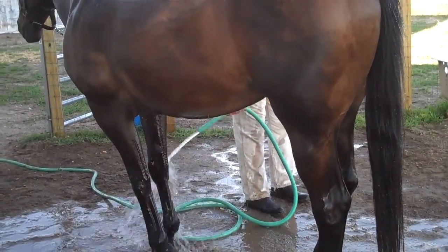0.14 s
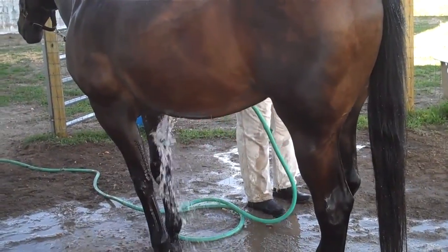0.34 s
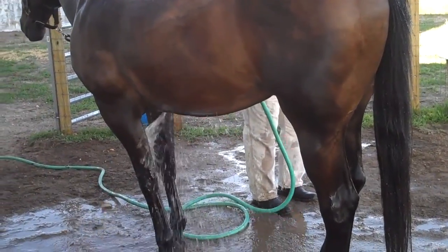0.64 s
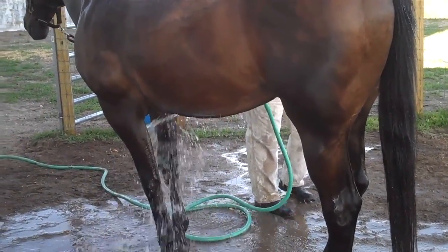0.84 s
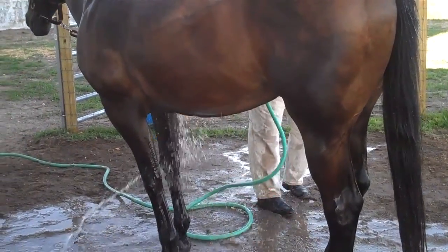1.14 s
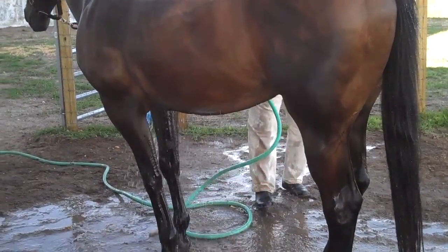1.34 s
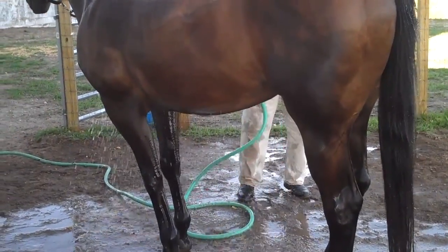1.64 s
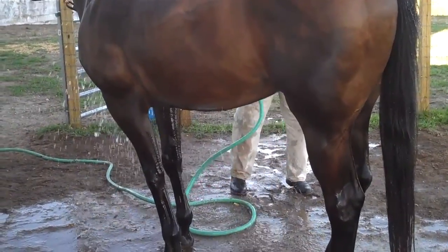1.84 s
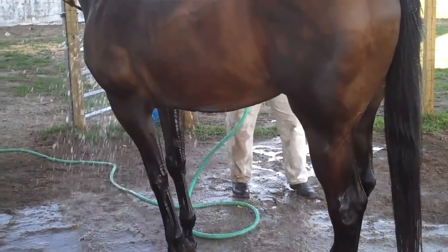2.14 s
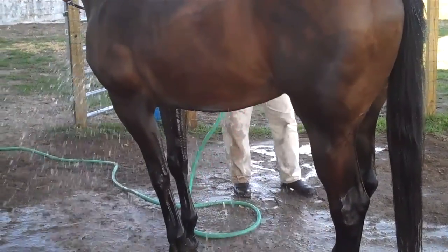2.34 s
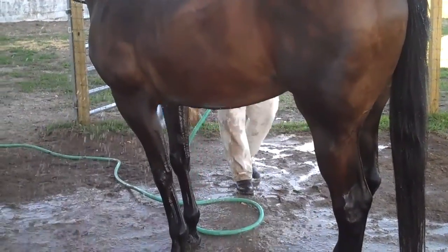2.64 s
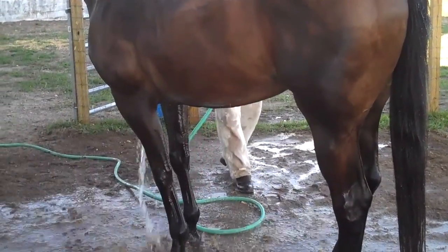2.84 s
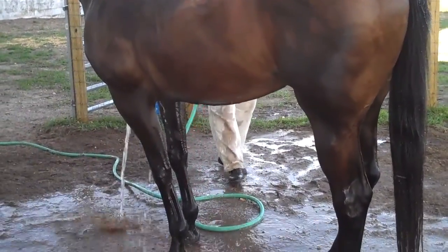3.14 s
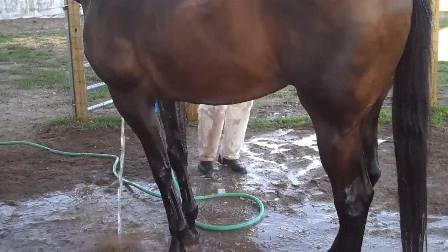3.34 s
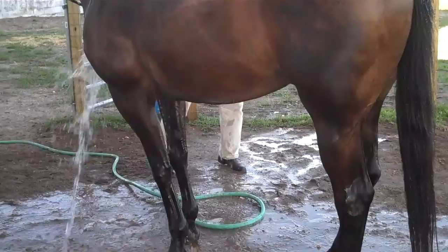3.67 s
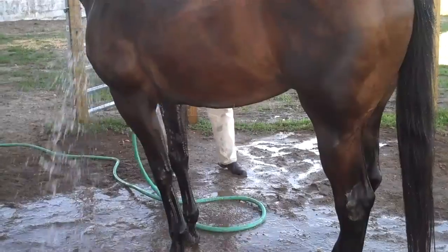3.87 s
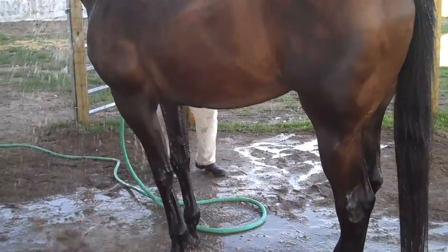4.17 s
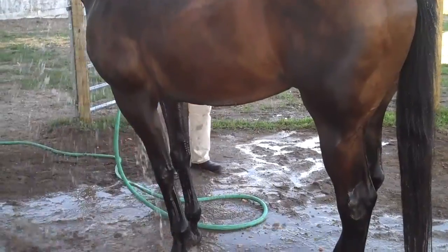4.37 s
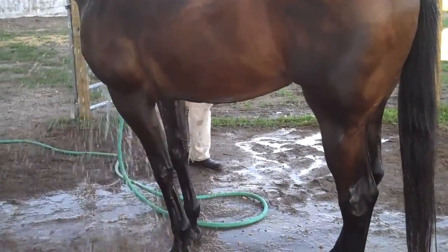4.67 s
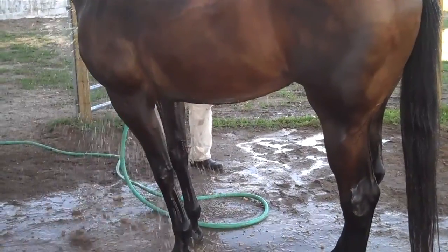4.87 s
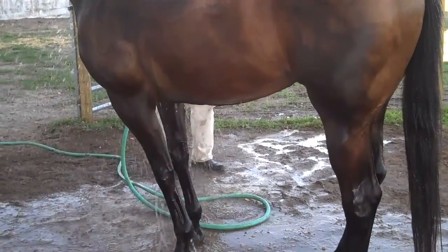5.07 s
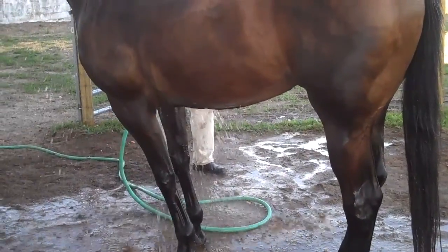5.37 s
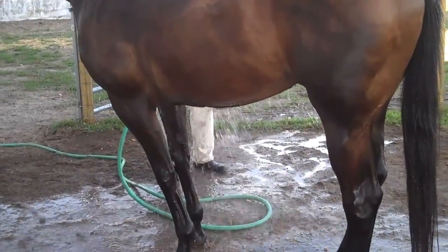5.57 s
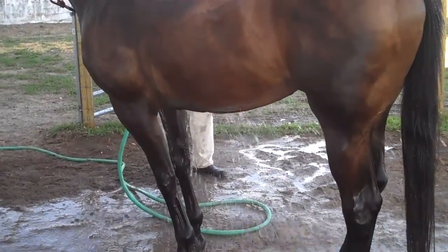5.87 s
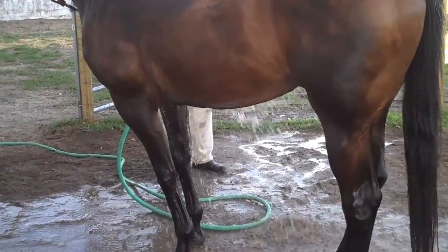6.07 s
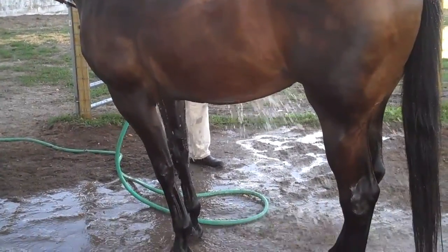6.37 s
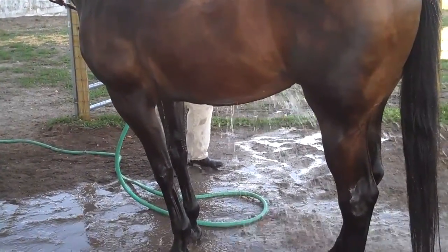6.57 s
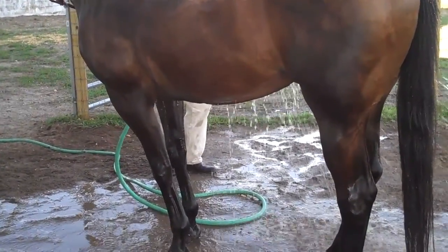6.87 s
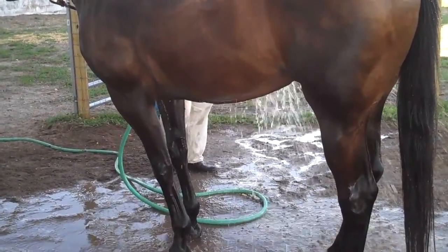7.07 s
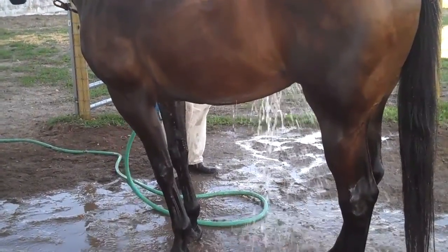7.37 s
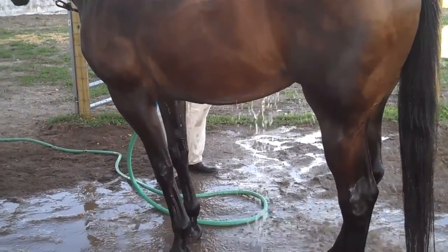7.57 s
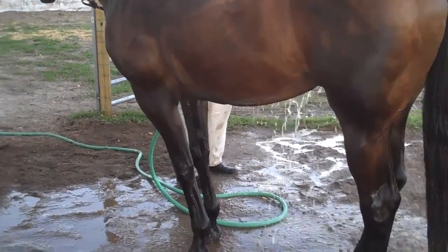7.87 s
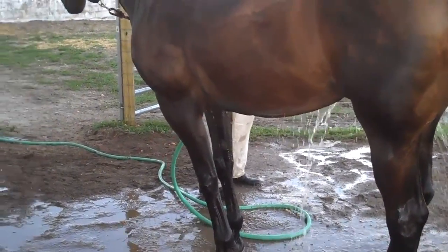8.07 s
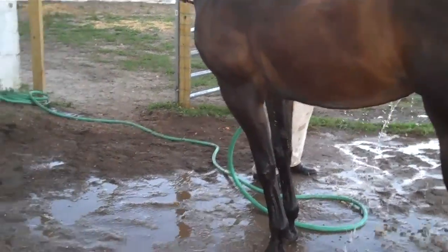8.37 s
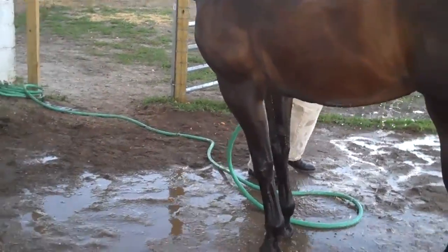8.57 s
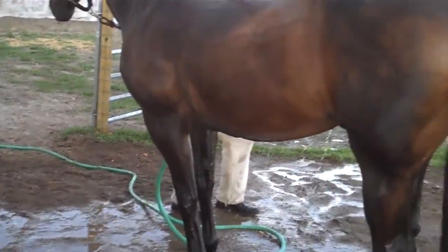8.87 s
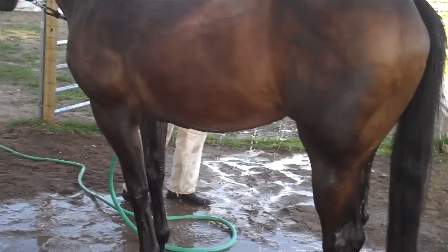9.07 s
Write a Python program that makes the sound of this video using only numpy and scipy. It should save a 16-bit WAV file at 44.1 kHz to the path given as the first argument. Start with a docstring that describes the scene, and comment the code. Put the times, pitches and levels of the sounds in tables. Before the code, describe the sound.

From 0 s a hose jet hisses and spatters on wet ground beside a horse, bright and grainy with some puddle churn. Short gushes come at about 0.7 and 1 s, then from 1.4 to 2.7 s the spray thins, leaving single plops and sharp drops exposed, one rounder plop near 2.05 s. At 2.87 s a strong splash bursts in, and heavier patter continues in surges, with dull little thuds and wind puffs around 3.5 s. Fuller splashing at 3.9 and 4.6 s alternates with brief lulls near 4.3 and 5.1 s. From 5.5 s the patter is finer and steadier, with cracks, ticks and a clear plop at 6.5 s. Ringing drops cluster from 8 to 9 s, a sharp crack at 8.64, ending with lower wet slaps around 9.15 s. Soft flank drumming, distant rumble and a faint wavering hum stay underneath; close, dry, outdoors.

```python
"""A garden hose plays over a horse in a muddy yard: impact noise and bubble resonance make its patter.
Slugs of run-off slap as short noise bursts, fat drops plop as ringing cavities, stray drops crack or blip.
The jet drums on the flank with a comb-filter echo; dry ticks and dull thuds are brief transients.
Light wind brushes the microphone as shaped noise, over distant rumble and a faint wavering hum."""
import sys
import numpy as np
from scipy import signal
from scipy.fft import rfft, irfft
from scipy.io import wavfile
from scipy.ndimage import uniform_filter1d

SR = 44100
rng = np.random.default_rng(int(sys.argv[2]) if len(sys.argv) > 2 else 0)


def unload_wav(signal):
    """Save mono or channel-first audio to the path in sys.argv[1] as 16-bit WAV at rate SR, clipped to [-1, 1]."""
    wavfile.write(
        sys.argv[1],
        SR,
        np.round(np.clip(np.atleast_2d(signal).T, -1, 1) * 32767).astype(np.int16),
    )


N = 406602
TIME = np.arange(N) / SR
CUTOFF_HZ = 14000  # upper limit of the slaps and of the record

# Relative filter gain of the patter: f/Hz, level/dB
PATTER_SPECTRUM = [(500, -18), (1200, -19.5), (1800, -7.5), (2400, 1), (3200, 2), (4200, 4), (6000, 1.5),
                   (8000, 1), (11000, -15.5), (14000, -48)]
# Relative filter gain of the puddle splash: f/Hz, level/dB
PUDDLE_SPECTRUM = [(300, -34), (700, -16), (1100, -10.5), (1500, -12), (2100, -4), (2700, -6.5),
                   (3600, -22), (6000, -4)]
# Relative filter gain of the fine mist: f/Hz, level/dB
MIST_SPECTRUM = [(2000, -26), (4500, -3), (7000, -0.5), (9000, 0), (11000, -4), (14000, -9)]
# The more water lands in puddles, the lower the patter's edge reaches; it also wanders at random
EDGE_HZ, EDGE_AT_DB = 1700, -17.5  # edge at this puddle share
EDGE_OCTAVES_PER_DB, EDGE_WANDER_OCTAVES = 0.29, 0.069
# The hollow that the jet digs in the water: centre, wander and strength of its ring
HOLLOW_HZ, HOLLOW_WANDER_OCTAVES, HOLLOW_DB = 3260, .33, 0


def spray():
    """Impact noise and bubble resonance: drops tick on coat and mud, ring bubbles and churn puddles."""
    patter_level, puddle_level, mist_level = gushes()
    # a weak spray has fewer drops, which stand out singly
    flow = rms_one(patter_level)

    # the water lands in lumps: quick ones on the coat, slower ones in the puddles
    surge = np.sqrt(flow) + clumps(per_s=160 * flow, spread_db=2.7, decay_s=.0016)
    slosh = .35 + clumps(per_s=100, spread_db=2.3, decay_s=.0045)
    ticks = rms_one(impacts(per_s=5000 * flow, spread_db=0.0))
    droplets = rms_one(impacts(per_s=3500 * flow, spread_db=2.0))

    # brief fizz, long-ringing drips and the low churn of the puddles
    fizz = bubbles(flow, spread_db=4.0, low_hz=1790, high_hz=12100, cycles=3.9, count=20000, size=128)
    drips = bubbles(np.sqrt(flow), spread_db=3.0, low_hz=1860, high_hz=9500, cycles=36,
                    count=4200, size=384)
    churn = bubbles(puddle_level, spread_db=2.5, low_hz=1072, high_hz=2890, cycles=20.5,
                    count=3500, size=640)

    grain = spatter(fizz + .5 * ticks + .5 * rng.standard_normal(N), flow)
    coat = rms_one(surge * grain)
    patter = coloured(coat + .45 * np.minimum(flow, 1) * drips, PATTER_SPECTRUM)
    puddle_share_db = 20 * np.log10(puddle_level / patter_level)
    edge_octaves = EDGE_WANDER_OCTAVES * drift(22) - EDGE_OCTAVES_PER_DB * (puddle_share_db - EDGE_AT_DB)
    patter = swept(patter, EDGE_HZ * 2 ** edge_octaves, q=0.58)
    hollow_hz = HOLLOW_HZ * 2 ** (HOLLOW_WANDER_OCTAVES * drift(9))
    patter = patter + from_db(HOLLOW_DB) * swept(patter, hollow_hz, q=7.3, peak=True)

    puddle = coloured(slosh * (churn + .4 * ticks), PUDDLE_SPECTRUM)
    fine_spray = spatter(droplets + fizz + from_db(-1) * rng.standard_normal(N), flow)
    mist = coloured(surge ** .4 * fine_spray, MIST_SPECTRUM)
    return patter_level * steady(patter) + puddle_level * steady(puddle) + mist_level * steady(mist)


# Even spray on the coat as the jet is aimed: t/s, patter level/dB, puddle splash re patter level/dB
AIMED_SPRAY = [(0, -41.5, -13.5), (.42, -42, -17), (.6, -46, -19.5), (1.3, -44, -14), (1.38, -48.5, -17),
               (1.55, -50.5, -21.5), (1.93, -51, -15.5), (2.15, -47.5, -13), (2.75, -50, -16),
               (3.1, -45, -13.5), (3.5, -46, -13), (3.87, -42, -12), (4.255, -43, -16), (4.29, -51, -16),
               (4.395, -51, -17), (4.55, -43.5, -13), (5.04, -42.5, -11), (5.08, -46, -15.5),
               (5.22, -43.5, -15), (5.29, -46, -17), (5.8, -42.5, -18), (6.7, -43.5, -20), (6.97, -45, -21),
               (7.2, -41.5, -19), (7.8, -45, -17), (8.3, -42.5, -17), (8.9, -44, -21.5), (9.22, -43, -17)]
# Jet or sheets of run-off reaching the ground: t/s, length/s, patter level/dB,
# puddle splash re patter level/dB, mist re patter level/dB
GROUND_GUSHES = [(0.0, .14, -39, -8, -22), (0.206, .17, -40, -14, -20), (.69, .19, -43, -14, 4),
                 (0.985, .14, -40, -12, 3.5), (1.125, .19, -37.5, -10, -3.5), (1.973, .15, -45.5, -9.5, -1),
                 (2.458, .045, -41.5, -15.5, 2.5), (2.826, .04, -44, -12, 14),
                 (2.866, .11, -34, -6.5, -2.5), (3.0, .12, -38, -11, -3.5), (3.184, .05, -41, -10, -5),
                 (3.336, .04, -41, -11, -13), (3.65, .19, -37.5, -8.5, -19), (3.899, .23, -36, -12, 1.5),
                 (4.397, .09, -40, -10.5, -2), (4.61, .42, -38.5, -11, 0), (5.44, .05, -46, -5, -13),
                 (5.529, .14, -40.5, -16, -2.5), (5.883, .22, -40.5, -16, -0.5), (6.126, .02, -36, -17, -6),
                 (6.213, .03, -39, -14, 5), (6.272, .04, -34, -15, 1.5), (6.46, .07, -41, -16, 0),
                 (7.25, .1, -38, -18, 3.5), (7.35, .04, -35, -15, -8), (7.53, .07, -39, -10, -1),
                 (7.673, .04, -42, -9.5, -4), (7.83, .04, -40, -12, -12), (7.968, .25, -42, -13, -6),
                 (8.45, .06, -41, -18, -13), (8.653, .08, -39, -19, 0.5), (9.04, .08, -35, -18.5, -1.5),
                 (9.11, .11, -41, -1.5, -18)]
GUSH_ATTACK_S, GUSH_SAG_DB_PER_S, GUSH_RELEASE_S = .008, 6, .042
GUSH_SWELL_SHARE = .08  # share of the gush length added to its attack
SPRAY_MIST_DB = 4  # mist of the even spray, relative to its mean patter
MIST_FOLLOWS = 0.77  # share of the patter's swing in dB that the mist follows
WOBBLE_DB, WOBBLE_HZ = 0.17, 14  # the hand-held jet never lands evenly


def gushes():
    """Power addition: gushes set in fast, sag and drain on top of the even spray's three levels."""
    aim_db, pool_db = in_time(AIMED_SPRAY)
    mean_db = aim_db.mean()
    haze_db = mean_db + SPRAY_MIST_DB + MIST_FOLLOWS * (aim_db - mean_db)
    power = from_db([aim_db, aim_db + pool_db, haze_db]) ** 2
    for s, length_s, db, puddle_db, mist_db in GROUND_GUSHES:
        at = max(int(s * SR), 0)
        age = TIME[:min(SR, N - at)]
        attack_s = GUSH_ATTACK_S + GUSH_SWELL_SHARE * length_s
        shape = (1 - np.exp(-age / attack_s)) * from_db(-GUSH_SAG_DB_PER_S * age)
        shape = shape * np.exp(-np.maximum(age - length_s, 0) / GUSH_RELEASE_S)
        peaks = from_db([[db], [db + puddle_db], [db + mist_db]])
        power[:, at:at + len(age)] += (peaks * shape) ** 2
    return np.sqrt(power) * from_db(WOBBLE_DB * drift(WOBBLE_HZ))


def clumps(per_s, spread_db, decay_s):
    """Jet break-up: each lump lands at once and scatters into droplets whose power dies away."""
    r = np.exp(-1 / (decay_s * SR))
    power = signal.lfilter([1], [1, -r], impacts(per_s, spread_db) ** 2)
    return np.sqrt(power / np.mean(power))


def spatter(x, flow, count=5):
    """Band-wise modulation: lumps of each size splash in their own band at their own moments."""
    spectrum, hz = rfft(x), np.fft.rfftfreq(N, 1 / SR)
    band = np.digitize(hz, np.geomspace(2400, 10500, count - 1))
    out = np.zeros(N)
    for k in range(count):
        lumps = 1.15 + clumps(per_s=260 * np.sqrt(flow), spread_db=2.3, decay_s=.0016)
        out += irfft(spectrum * (band == k), N) * lumps
    return out


def bubbles(flow, spread_db, low_hz, high_hz, cycles, count, size):
    """Bubble resonance: born as often as the flow dictates, each rings at its slightly rising pitch."""
    when, pitch, strength, damping = rng.random((4, count, 1))
    at = np.searchsorted(np.cumsum(flow) / np.sum(flow), when) + np.arange(size)
    hz = low_hz * (high_hz / low_hz) ** pitch
    turns = hz * np.arange(size) / SR
    age = turns / (cycles * (.5 + damping))  # the ring has decayed by 60 dB at age 1
    gain = from_db(spread_db * np.minimum(-np.log(1 - strength), 4)) * hz / low_hz
    rings = gain * np.exp(-np.log(1000) * age) * np.sin(2 * np.pi * turns * (1 + 0.086 * age))
    return rms_one(np.bincount(at.ravel(), rings.ravel(), N)[:N])


# Water on the horse: t/s, level/dB, pitch of the ground-echo colour f/Hz
FLANK_DRUMMING = [(0, -84, 520), (1.1, -59, 530), (1.7, -75, 556), (2.4, -60, 704), (3.2, -68, 630),
                  (4.1, -61, 660), (4.82, -58.5, 640), (5.1, -66.5, 546), (5.7, -65, 443), (9.22, -63, 430)]
# Relative filter gain of the thuds on the flank: f/Hz, level/dB
FLANK_SPECTRUM = [(120, -22.5), (300, -5.5), (450, -0.5), (600, 1), (900, 1), (1300, -9), (2500, -20.5)]


def drumming():
    """Comb filtering: jet thuds on the flank join their ground echo, whose delay moves with the jet."""
    level_db, echo_hz = in_time(FLANK_DRUMMING)
    direct = coloured(impacts(per_s=900, spread_db=0.5), FLANK_SPECTRUM)
    echo = np.interp(TIME - 1 / echo_hz, TIME, direct)
    return from_db(level_db) * rms_one(direct + 0.69 * echo)


# Slugs of water on coat and ground: t/s, burst level before its envelope/dB, decay/s, centre f/Hz
WATER_SLAPS = [(0.705, -25.5, 0.0061, 6260), (0.731, -25.5, 0.0054, 6100), (.877, -26, .004, 6000),
               (1.152, -29, 0.014, 5000), (1.191, -25, 0.0057, 5430), (1.349, -24.5, 0.0046, 3880),
               (2.213, -25.5, 0.003, 6100), (2.318, -22, 0.0025, 3970), (2.869, -24.5, 0.02, 3040),
               (3.092, -25, 0.0048, 3200), (3.361, -32, 0.0046, 7400), (3.819, -28, 0.0041, 2300),
               (3.838, -23, 0.0034, 3160), (4.088, -28, 0.0082, 2980), (4.348, -26.5, 0.0034, 4550),
               (4.774, -24, 0.0035, 5600), (5.031, -27, 0.0037, 3850), (5.2, -26, 0.0035, 4000),
               (5.23, -26, 0.0035, 4800), (5.637, -24, 0.0033, 4600), (5.923, -28, 0.0051, 4800),
               (6.145, -24, 0.0053, 5100), (6.292, -24, 0.0032, 6600), (6.319, -21, 0.0024, 4500),
               (6.814, -31.5, 0.014, 4900), (7.368, -27, 0.0067, 4220), (8.104, -23, 0.0032, 5100),
               (8.337, -25, 0.0023, 5800), (9.116, -29.5, 0.005, 2700), (9.133, -25.5, 0.0033, 1970),
               (9.169, -29, 0.0056, 1495), (9.183, -27.5, 0.0025, 2400), (9.213, -27.5, 0.0061, 2000)]


def slaps(rise_s, width, size=4096):
    """Band-limited impact noise: a slug of water bursts into a dense, broad, decaying crackle."""
    out, age = np.zeros(N + size), TIME[:size]
    crackle = impacts(per_s=18000, spread_db=2.5)
    for s, db, decay_s, hz in WATER_SLAPS:
        at = int(s * SR)
        edges_hz = [hz / width, min(hz * width, CUTOFF_HZ)]
        band = signal.butter(2, edges_hz, "band", fs=SR, output="sos")
        burst = rms_one(signal.sosfilt(band, crackle[at - size:at]))
        envelope = (1 - np.exp(-age / rise_s)) * np.exp(-age / decay_s)
        out[at:at + size] += from_db(db) * envelope * burst
    return out[:N]


# The loudest fat drops: t/s, peak level of the ring's envelope/dB, f/Hz, spatter re that peak level/dB
FAT_DROPS = [(0.2466, -22.5, 3270, -25), (0.3311, -30, 2090, -22), (0.835, -36, 1250, -6),
             (0.877, -21, 3800, -30), (1.0222, -23.5, 3020, -28), (1.0758, -27, 2630, -28),
             (1.3346, -22, 4410, -8), (1.866, -24.5, 3940, -13), (1.888, -35, 2320, -3),
             (1.9933, -28.5, 5070, -0.5), (2.0558, -17, 2370, -35), (2.3193, -23.5, 2780, -22),
             (2.3553, -26.5, 8060, -1.5), (2.4656, -20.5, 3820, -2.5), (2.873, -22, 2630, 2),
             (3.016, -18, 6430, -12), (3.564, -23, 3000, -31), (3.665, -23.5, 2900, -1),
             (3.7663, -26, 3730, -17), (3.82, -27.5, 1340, -26), (3.8197, -25, 2400, -19),
             (4.087, -17.5, 2860, -15), (4.406, -26.5, 3720, -5), (4.465, -39, 1510, -4),
             (5.118, -27.5, 2900, -20), (5.906, -20, 4770, -23), (6.536, -14, 3950, -27),
             (7.097, -32, 2060, -24), (7.113, -38, 1910, -28), (7.599, -27, 3200, -12),
             (7.699, -23, 2360, -23), (7.992, -29, 2660, -25), (8.0138, -21.5, 2670, -16),
             (8.174, -24, 3920, -25), (8.2423, -18, 4120, -29), (8.2496, -16, 2410, -16),
             (8.3221, -27, 5300, -12), (8.4594, -19, 3100, -21), (8.665, -27.5, 6260, 1.5),
             (8.745, -24, 4440, -13), (8.826, -18, 5500, -17), (8.9588, -17, 6000, -28),
             (9.053, -18, 4930, -23.5), (9.1718, -26, 1740, -5.5), (9.205, -24.5, 3630, -1)]
# Drops pitched below the reference open larger cavities, which ring for more cycles
PLOP_REF_HZ, PLOP_SIZE_POWER = 3500, 0.093


def plops(swell_cycles, smack_db, smack_s, spatter_s):
    """Cavity resonance: a fat drop smacks down, its cavity rings a few cycles, and fine spatter flies."""
    rings, splash, t = np.zeros(N + SR), np.zeros(N + SR), np.arange(SR // 12) / SR
    for s, db, hz, spatter_db in FAT_DROPS:
        age = t * hz / (swell_cycles * (PLOP_REF_HZ / hz) ** PLOP_SIZE_POWER)
        at = int(s * SR)
        rings[at:at + len(t)] += from_db(db) * age * np.exp(1 - age) * np.sin(2 * np.pi * hz * t)
        smack = from_db(db + smack_db) * np.exp(-t / smack_s)
        splash[at:at + len(t)] += smack + from_db(db + spatter_db) * np.exp(-t / spatter_s)
    # splash filter: (Hz, relative dB)
    colour = [(500, -7.5), (1400, -9), (2500, 8.5), (5000, 11.0), (9000, 7.0), (14000, -10.0)]
    splash = splash[:N]
    return rings[:N] + coloured(splash * rng.standard_normal(N), colour) * np.sqrt(np.mean(splash ** 2))


# The sharpest drops cracking on mud: t/s, peak of the envelope before the noise and band filter, level/dB
MUD_CRACKS = [(.509, -24), (2.04, -25), (2.099, -25), (2.608, -20), (2.705, -29), (2.768, -23),
              (4.012, -19), (4.417, -24), (4.466, -19), (5.1865, -17), (5.331, -18.5), (5.551, -19),
              (7.087, -21.5), (8.29, -21), (8.636, -15.5)]


def stray_drops(crack_s, blip_db):
    """Impact noise and bubble resonance: drops clear of the jet crack on mud or blip in shallow water."""
    hits = from_db(-33.5) * np.abs(impacts(per_s=42, spread_db=2.4))
    for s, db in MUD_CRACKS:
        hits[int(s * SR)] = from_db(db)
    envelope = signal.lfilter([1], [1, -np.exp(-1 / (crack_s * SR))], hits + 1e-18)
    band = signal.butter(2, [2700, 9500], "band", fs=SR, output="sos")
    cracks = signal.sosfilt(band, envelope * rng.standard_normal(N))
    blips = bubbles(from_db(in_time(AIMED_SPRAY)[0]), spread_db=2.2, low_hz=2000, high_hz=4600,
                    cycles=22, count=200, size=768)
    return cracks + from_db(blip_db) * blips


def scatter(x, t60, wet_db):
    """Diffuse reflection: ground, horse and fence throw back a short, exponentially decaying tail."""
    t = np.arange(SR // 4) / SR
    tail = rng.standard_normal(len(t)) * np.exp(-np.log(1000) * t / t60) * (t > .002)
    return x + from_db(wet_db) * signal.fftconvolve(x, tail / np.linalg.norm(tail))[:N]


# Dry little ticks: t/s, peak level/dB
BLUNT_TICKS = [(0.557, -32.5), (0.837, -33), (3.966, -26), (4.088, -30.5), (5.885, -26), (6.149, -31),
               (6.348, -23.5), (7.322, -25)]


def dry_ticks(dull_hz):
    """Impulse response of a one-pole low-pass: short blunt ticks with no ring."""
    clicks = np.zeros(N)
    for s, db in BLUNT_TICKS:
        clicks[int(s * SR)] = from_db(db)
    return signal.lfilter([1], [1, -np.exp(-2 * np.pi * dull_hz / SR)], clicks + 1e-18)


# Dull, short low thuds: t/s, peak level of the envelope/dB, f/Hz
DULL_THUDS = [(3.109, -40, 274), (3.141, -46, 300), (3.383, -43, 340), (3.455, -41, 229), (3.496, -39, 310),
              (3.544, -40, 600), (3.548, -37, 380), (3.564, -46, 220), (3.571, -32, 282),
              (3.573, -35.5, 640), (3.582, -36, 180), (3.599, -41, 200), (3.857, -45, 149),
              (3.877, -47, 190), (4.517, -45, 231), (4.528, -50, 191), (4.775, -52, 160),
              (5.53, -39.5, 208), (5.604, -50, 260), (8.27, -47, 185)]


def thuds(swell_cycles):
    """Heavily damped oscillation: each thud swells and dies within about two cycles."""
    out, t = np.zeros(N + SR), TIME[:SR // 20]
    for s, db, hz in DULL_THUDS:
        age, at = t * hz / swell_cycles, int(s * SR)
        out[at:at + len(t)] += from_db(db) * age * np.exp(1 - age) * np.sin(2 * np.pi * hz * t)
    return out[:N]


# Puffs on the microphone: t/s, level before the low cut/dB, half length/s, deep bass re that level/dB
WIND_PUFFS = [(1.912, -61, 0.028, -1), (3.45, -54.5, 0.03, -11), (3.59, -47.5, 0.053, -9),
              (3.878, -54, 0.023, -5), (4.24, -53, 0.049, -2), (4.532, -57.5, 0.014, 1),
              (5.615, -54.5, 0.038, -7), (5.86, -71, .1, 7)]
# Relative filter gain of the body of a puff: f/Hz, level/dB
WIND_SPECTRUM = [(25, -26), (70, -1), (130, -1), (220, 3), (350, -8), (550, -9), (900, -34), (2000, -23)]
WIND_LOW_CUT_HZ = 125  # border between the body of a puff and its deep bass


def wind():
    """Turbulence noise: short lumpy puffs; stronger ones reach higher, some thump in the deep bass."""
    level, deep_level = np.zeros(N), np.zeros(N)
    for s, db, half_s, deep_db in WIND_PUFFS:
        swell = from_db(db) / (1 + ((TIME - s) / half_s) ** 2)
        level += swell
        deep_level += swell * from_db(deep_db)
    lumps = rng.standard_normal(N) * from_db(2.5 * drift(80))
    upper = coloured(lumps, [(150, -15.0), (350, 0.0), (600, -1.5), (1000, -14.0), (2000, -15.0)])
    puffs = level * (coloured(lumps, WIND_SPECTRUM) + 0.84 * np.sqrt(level / level.max()) * upper)
    low_cut = signal.butter(2, WIND_LOW_CUT_HZ, "high", fs=SR, output="sos")
    deep_band = signal.butter(2, [45, WIND_LOW_CUT_HZ], "band", fs=SR, output="sos")
    deep = rms_one(signal.sosfilt(deep_band, rng.standard_normal(N)))
    return signal.sosfilt(low_cut, puffs) + deep_level * deep


# Distant rumble: t/s, level/dB
RUMBLE_LEVEL = [(0, -53), (1.2, -58), (2.2, -52.5), (4.6, -57), (5.4, -52), (6.8, -56), (9.22, -56.5)]
# Relative filter gain of the rumble: f/Hz, level/dB
RUMBLE_SPECTRUM = [(25, 10), (50, -11), (100, -0.5), (140, -14), (220, 0.5), (400, 0), (700, -4.5),
                   (1000, 1), (2000, 2.5), (5000, -4)]
# Far hum partials: f/Hz, level before swell and waver/dB
HUM_PARTIALS = [(109, -82), (326, -82.5)]
# Swelling and fading of the hum: t/s, added level/dB
HUM_SWELLING = [(0, 12.5), (.95, 6.5), (1.3, -2), (1.9, 13), (2.8, 10.5), (3.3, 4), (4.8, 4.5), (5.45, 12),
                (6.1, 10), (6.7, -5), (8, 1.5), (8.4, 8.5), (9.22, 3)]
HUM_WAVER_DB = 4.5


def yard():
    """Filtered noise and modulated tones: distant rumble and a hum wavering in pitch and level."""
    (rumble_db,), (swell_db,) = in_time(RUMBLE_LEVEL), in_time(HUM_SWELLING)
    hum = np.zeros(N)
    for hz, db in HUM_PARTIALS:
        level = from_db(db + swell_db + HUM_WAVER_DB * drift(2.6))
        phase = 2 * np.pi * np.cumsum(hz + 0.8 * drift(6.2)) / SR
        hum += level * np.sqrt(2) * np.sin(phase)
    return from_db(rumble_db) * coloured(rng.standard_normal(N), RUMBLE_SPECTRUM) + hum


def impacts(per_s, spread_db):
    """Random point process: clicks of either sign, many small and few large."""
    sizes = from_db(spread_db * np.minimum(rng.exponential(1, N), 4)) * rng.choice([-1, 1], N)
    return sizes * (rng.random(N) < per_s / SR)


def coloured(x, spectrum, size=8192):
    """Minimum-phase filtering: a causal filter with the given spectrum, scaled to rms 1."""
    hz, db = np.transpose(spectrum)
    shape = np.interp(np.log(np.fft.rfftfreq(size, 1 / SR) + 1), np.log(hz), db)
    cepstrum = irfft(np.log(from_db(shape)))[:size // 2]  # the causal half gives minimum phase
    response = irfft(np.exp(2 * rfft(cepstrum, size)))
    return rms_one(signal.oaconvolve(x, response)[:N])


def swept(x, corner_hz, q, peak=False, size=256):
    """Second-order resonance: a two-pole high-pass, or resonant peak, whose frequency moves."""
    out, state = np.zeros(N), np.zeros(2)
    for at in range(0, N, size):
        w = 2 * np.pi * np.clip(corner_hz[at], 500, 6000) / SR
        c, damping = np.cos(w), np.sin(w) / (2 * q)
        b = [damping, 0, -damping] if peak else np.array([1, -2, 1]) * (1 + c) / 2
        a = [1 + damping, -2 * c, 1 - damping]
        out[at:at + size], state = signal.lfilter(b, a, x[at:at + size], zi=state)
    return out


def steady(x):
    """Level normalisation: keep the grain, even out the slow level."""
    return x / np.sqrt(uniform_filter1d(x ** 2, size=5000) + 1e-9)


def drift(rate_hz):
    """Low-passed noise: slow chance with spread 1."""
    size = N // 32
    hz = np.fft.rfftfreq(size, N / size / SR)
    slow = irfft(rfft(rng.standard_normal(size)) / (1 + (hz / rate_hz) ** 2), size)
    return np.interp(TIME, np.linspace(0, N / SR, size), rms_one(slow))


def in_time(rows):
    """Linear interpolation: each column of a curve at every sample."""
    s, *columns = np.transpose(rows)
    return [np.interp(TIME, s, c) for c in columns]


def rms_one(x):
    """Power normalisation: scale to rms 1."""
    return x / np.sqrt(np.mean(x ** 2) + 1e-20)


def from_db(db):
    """Logarithmic level: decibels to amplitude gain."""
    return 10 ** (np.asarray(db) / 20)


def scene():
    """Superposition: water, ticks, thuds, wind and yard add at one microphone."""
    drops = plops(swell_cycles=1.22, smack_db=-8.5, smack_s=0.0007, spatter_s=0.0024)
    drops = drops + stray_drops(crack_s=0.00053, blip_db=-56)
    splashes = scatter(drops + slaps(rise_s=0.0012, width=1.76), t60=0.058, wet_db=-7.0)
    water = spray() + drumming() + splashes
    mix = water + dry_ticks(dull_hz=1120) + thuds(swell_cycles=0.43) + wind() + yard()
    return mix[None]


def record(dry):
    """Band limitation: an elliptic low-pass cuts the top steeply."""
    return signal.sosfilt(signal.ellip(10, .2, 70, CUTOFF_HZ, fs=SR, output="sos"), dry)


dry = scene()
out = record(dry)
unload_wav(out)
```